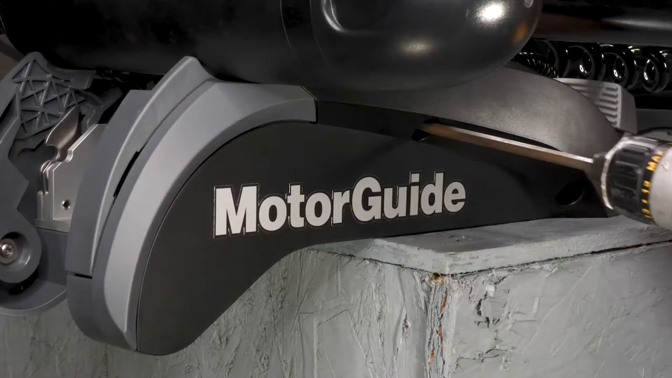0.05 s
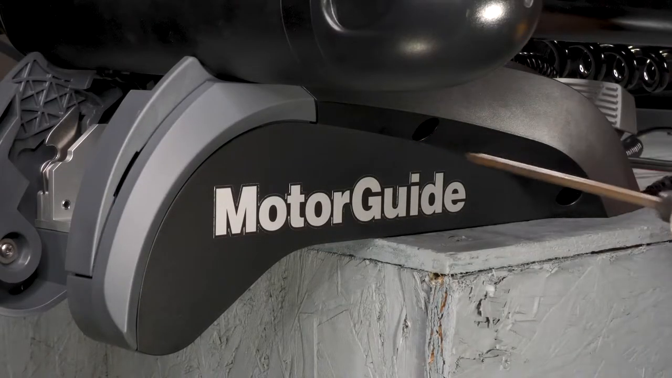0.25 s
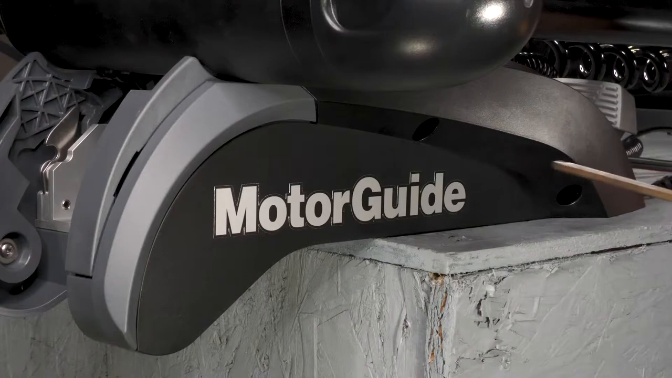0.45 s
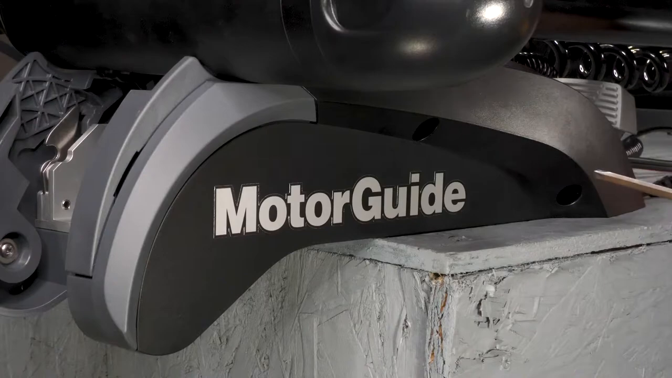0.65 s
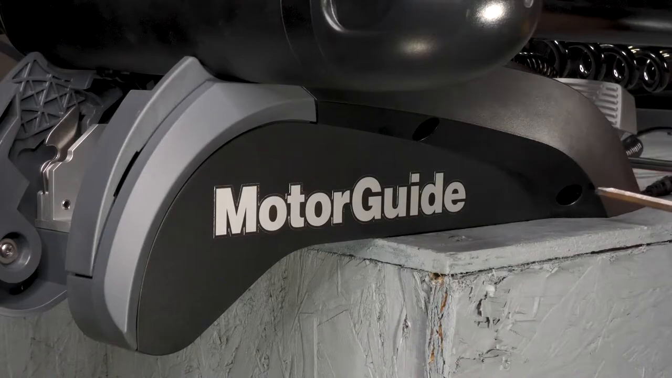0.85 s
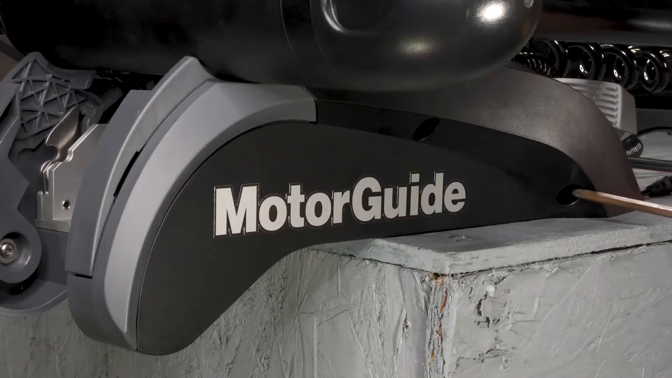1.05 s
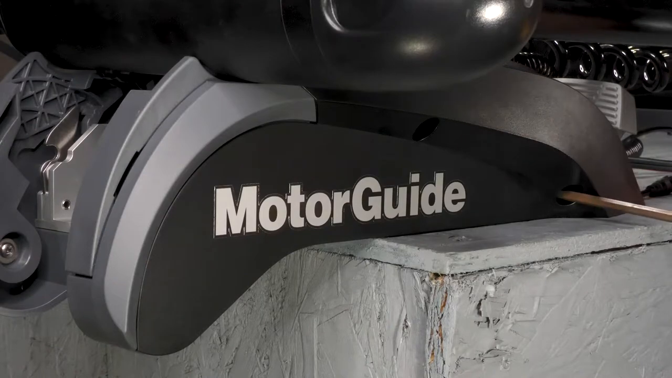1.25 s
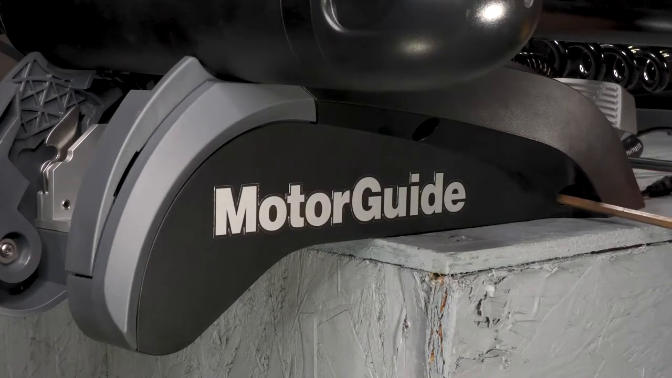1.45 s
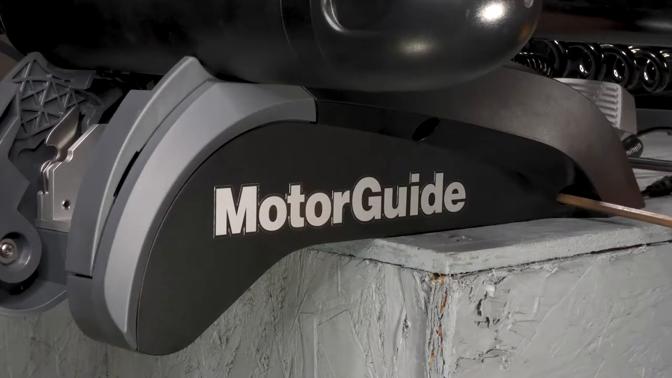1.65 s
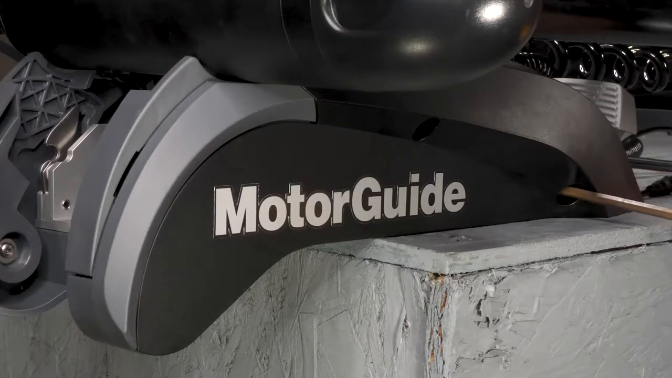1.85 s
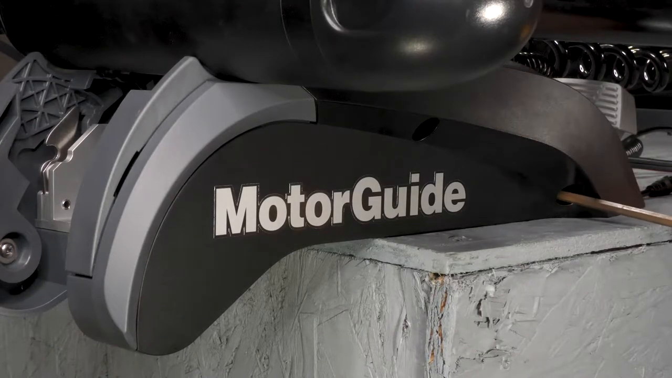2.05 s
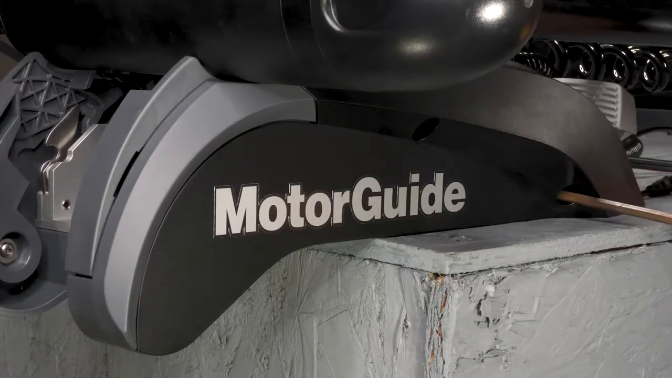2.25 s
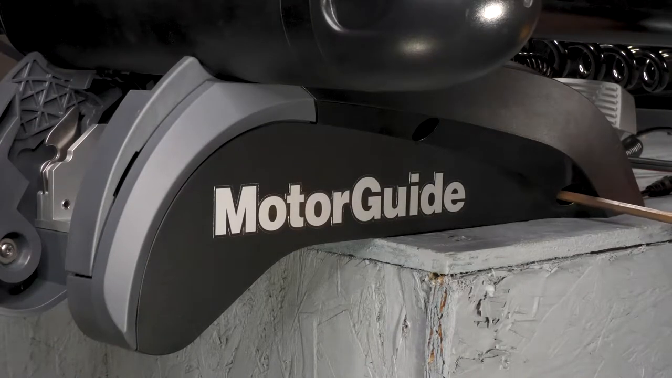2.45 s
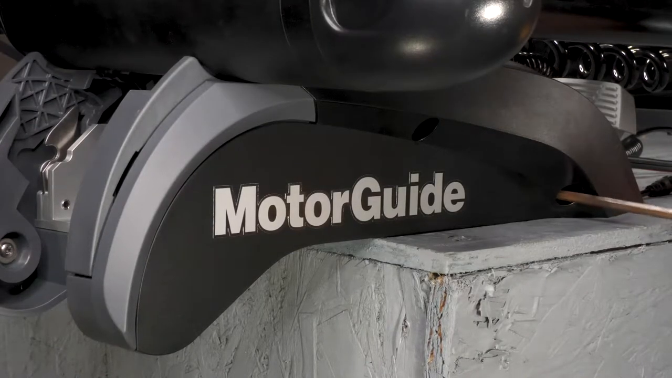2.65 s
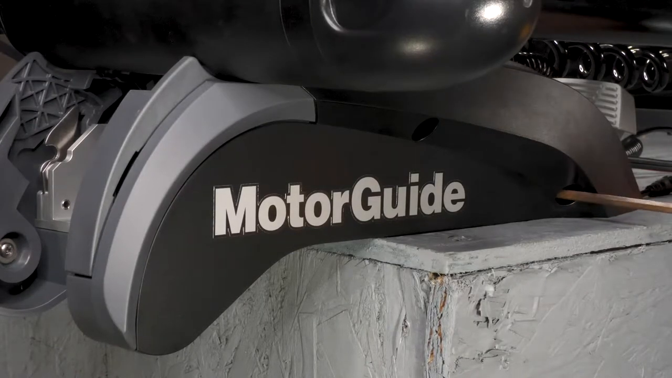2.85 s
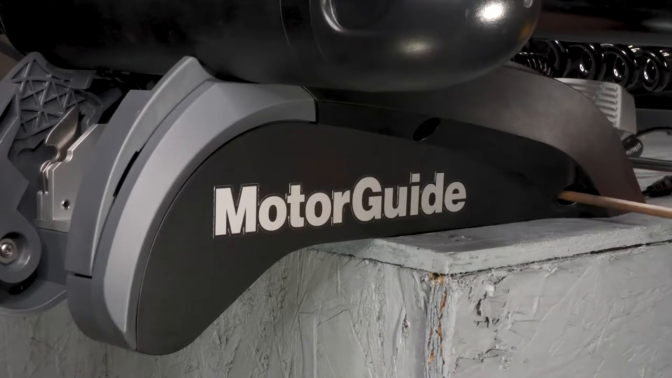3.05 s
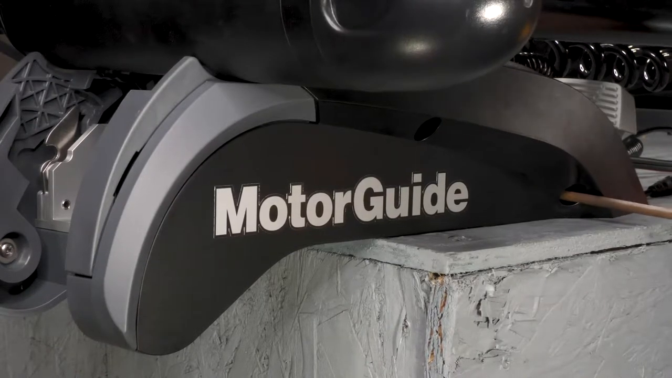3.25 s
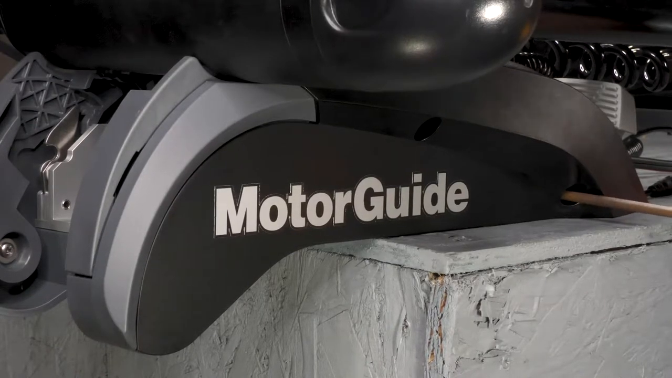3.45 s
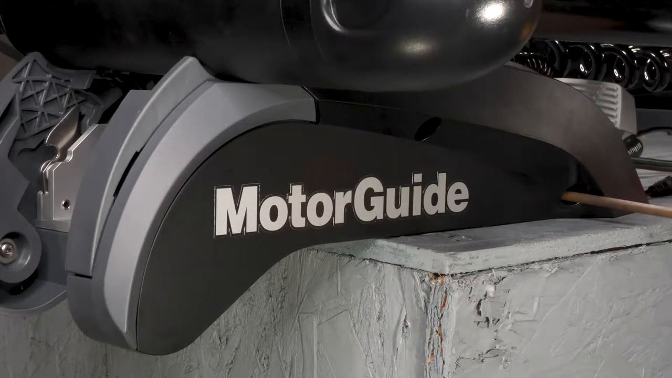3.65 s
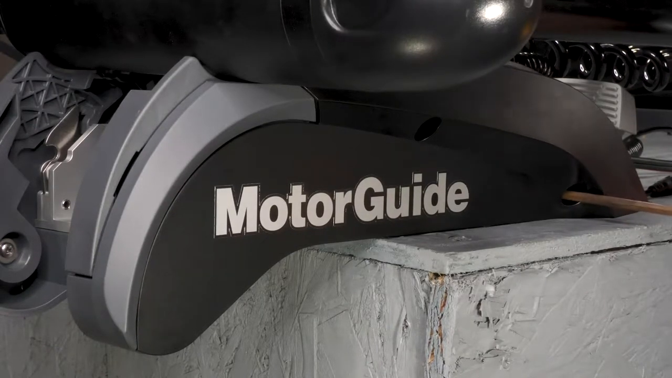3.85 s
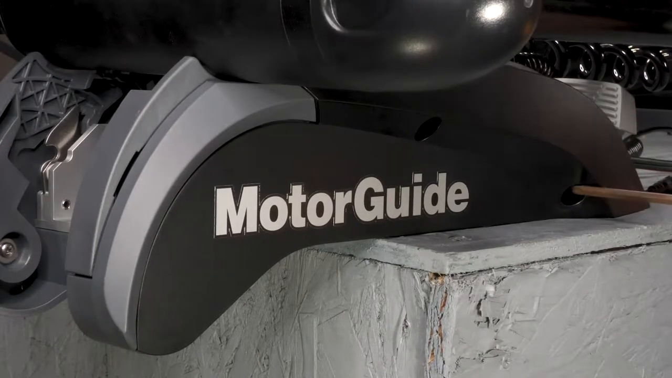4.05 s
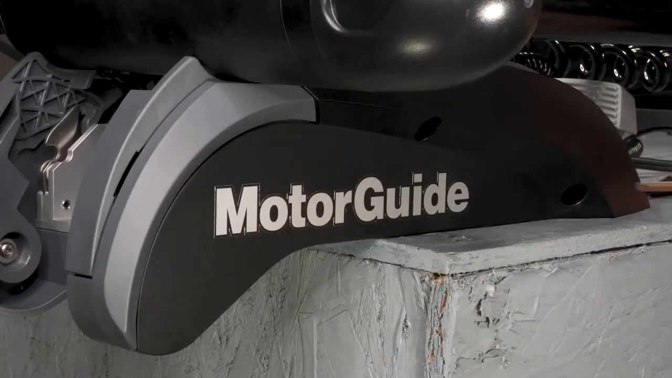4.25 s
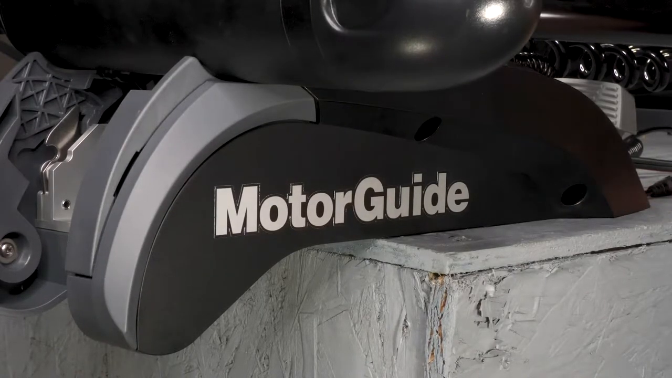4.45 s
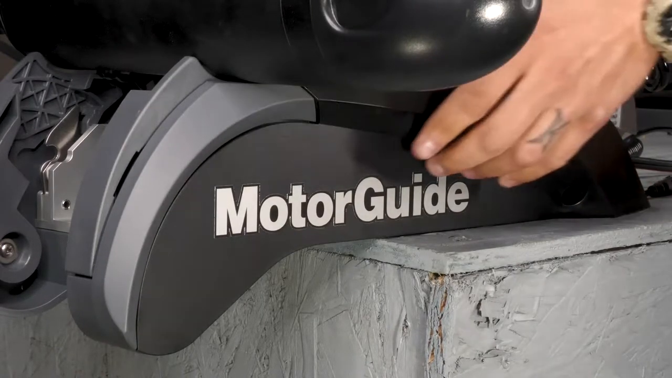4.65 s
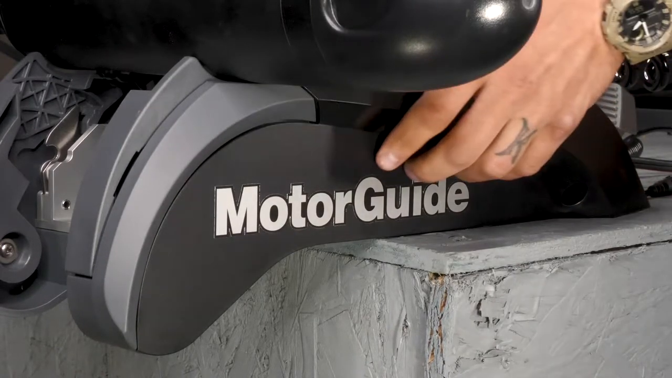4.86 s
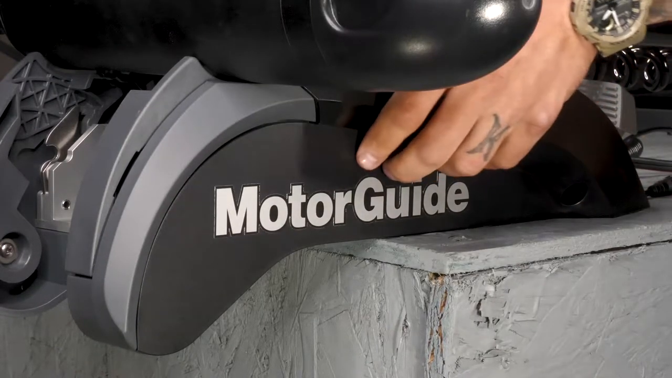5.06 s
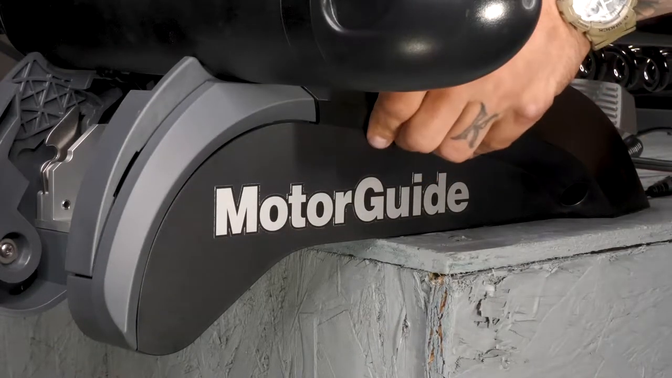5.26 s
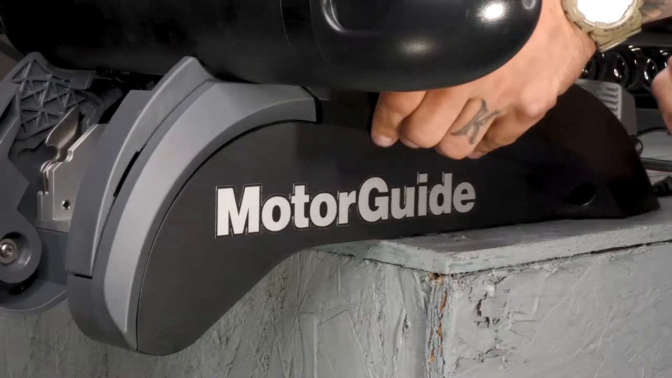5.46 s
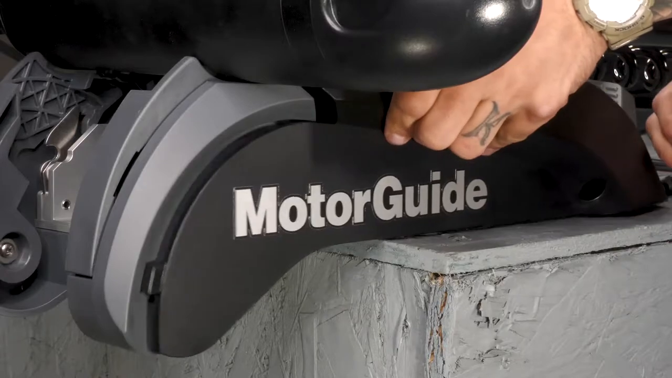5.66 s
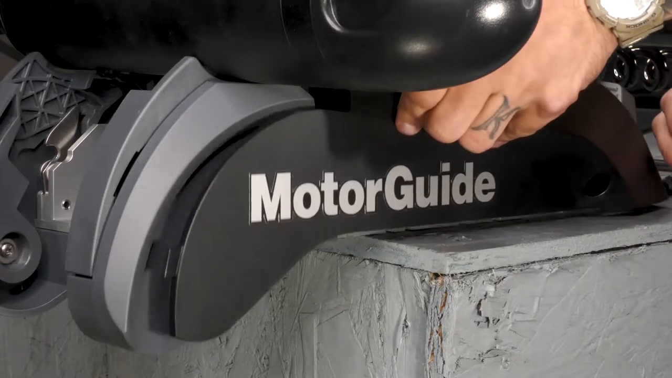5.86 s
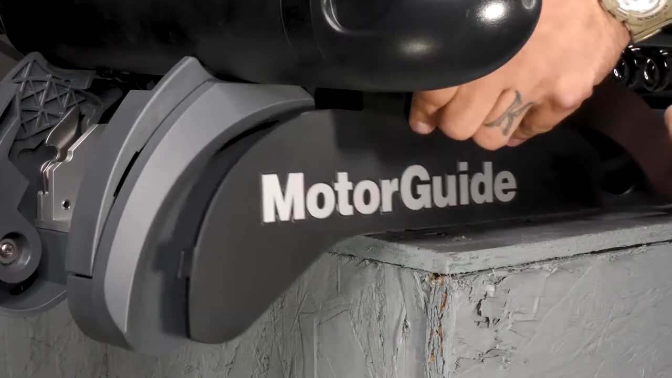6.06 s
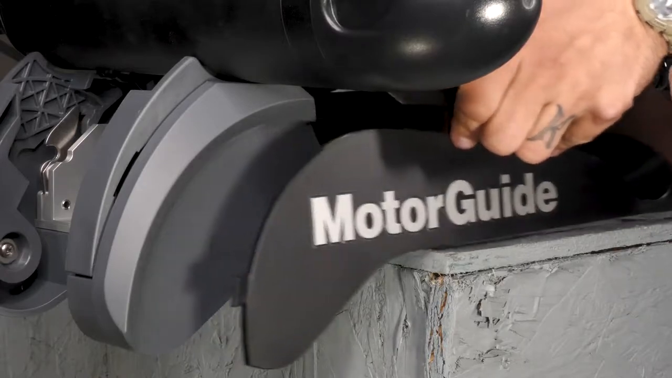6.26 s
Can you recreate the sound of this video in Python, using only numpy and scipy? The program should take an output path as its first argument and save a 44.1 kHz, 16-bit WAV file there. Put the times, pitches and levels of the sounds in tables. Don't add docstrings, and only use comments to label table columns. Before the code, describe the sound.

Over low ventilation rumble, metal taps and scrapes lead to a short jerky driver burst, a brake clack, soft rubbing and plastic snaps.

```python
import sys
import numpy as np
from scipy import signal
from scipy.fft import rfft, irfft
from scipy.io import wavfile
from scipy.ndimage import uniform_filter1d

SR = 44100
rng = np.random.default_rng(int(sys.argv[2]) if len(sys.argv) > 2 else 0)


def undo_db(level):
    steps = np.asarray(level, float) / 20
    return 10 ** steps


def wav_record(signal):
    frames = np.transpose(np.atleast_2d(signal))
    bounded = np.clip(frames, -1, 1)
    quanta = np.round(bounded * 32767).astype(np.int16)
    wavfile.write(sys.argv[1], SR, quanta)


N = 277830

# pitch_hz, density_db_per_hz
SHOP_RUMBLE = [(11, -45), (18, -1.5), (32, -19.5), (59, 2), (118, -8.5), (133, 3.5), (146, -22), (187, -10),
               (248, -23), (270, -27), (300, -26.5), (390, -53), (660, -120)]
# pitch_hz, density_db_per_hz
UNLOADED_RUMBLE = [(11, -38), (18, -4), (70, -6), (91, -7), (103, -12.5), (129, 4.5), (150, -4),
                   (163, -14.5), (300, -25), (390, -60), (660, -120)]
# pitch_hz, density_db_per_hz
AIR_HISS = [(180, -28), (300, -4), (331, -9), (527, -14.5), (839, -20), (1950, -27), (2510, -32.5),
            (2720, -31.5), (6780, -38.5), (9140, -30), (15800, -43)]
# pitch_hz, level_db, t60_s
BOX_MODES = [(45.2, -7, 0.78), (95, -16.5, 0.91), (140.2, -2, 0.43), (162.2, 1, 0.27), (196.3, -7.5, 0.36),
             (239.6, -6, .36), (288, -15, 0.49), (346.4, -11.5, 0.35), (425, -17, .13)]
# pitch_hz, t60_s
ROOM_DECAY = [(60, 0.52), (280, 0.93), (740, 0.38), (1940, 0.26), (5120, 0.23), (13500, 0.15)]
# start_s, peak_db, weight_db, sharpness_db, box_push_db
BIT_EXIT = [
    (0.0014, -49.5, 6.9, -15, -40),
    (0.0186, -46, 6.3, -25, -51),
]
# pitch_hz, width_hz, level_db
BRACKET_MODES = [(408, 110, 9.5), (708, 53, 6.5), (1190, 93, 3), (1530, 15, 9), (1740, 61, 7),
                 (2080, 28, 8), (2510, 120, -6)]
# start_s, peak_db, weight_db, sharpness_db, box_push_db
BIT_TAPS = [(1.3399, -44, 10.5, -15, -47), (1.3748, -36, 2.5, -5, -47), (1.4296, -40.5, 0.5, -11, -44),
            (1.6831, -61.5, 11.5, -8, -50.5), (1.6927, -63.5, 3, -1, -58), (1.7644, -69.5, 16, -2, -52),
            (1.7918, -49, 14.5, 0, -43), (1.871, -57, 5, 3.5, -63), (1.9001, -54, -23, -17, -59.5),
            (1.9515, -55, 13, -10, -43.5), (1.9744, -38, 3, -17, -43), (1.9898, -43.5, 9.5, -0.5, -36.5),
            (2.1046, -63, -8, -20, -48), (2.1425, -54.5, -14, -3.5, -55), (2.1604, -60, 9, -10, -49),
            (2.266, -32.5, 1.5, 3, -22.5), (2.4952, -51, 1.5, -12, -43.5), (2.6147, -29, 7, -2, -30),
            (2.6173, -14.5, -6.5, -4, -19), (2.6242, -25, -2.5, 1, -14.5), (2.9452, -23, -1, -11.5, -30)]
# pitch_hz, width_hz, level_db
STEEL_MODES = [(1144, 200, 0.5), (2676, 200, 10.5), (3930, 300, 1), (4870, 260, 0.5), (7250, 820, -2.5),
               (9100, 1800, -2)]
# peak_s, level_db, rise_s, fall_s (rise and fall over 25 dB)
SCRAPES = [
    (1.684, -76, .07, .07),
    (2.6, -63, 0.19, 0.011),
    (2.611, -42, 0.0049, 0.0058),
    (2.895, -55.5, 0.012, 0.24),
    (2.94, -52.5, 0.09, .008),
]
# pitch_hz, density_db_per_hz
SCRAPE_COLOUR = [(600, -30.5), (1000, -4), (2300, -6), (2700, 2.5), (3300, -10.5), (5000, -5.5),
                 (8000, -20), (15000, -40)]
# pitch_hz, density_db_per_hz
BRUSH_COLOUR = [(1180, -26), (2000, 2), (3730, -7), (4710, -7), (5090, -5), (5740, -10), (8050, -4.5),
                (8550, -5.5), (9570, -5), (15800, -11.5)]
# pitch_hz, density_db_per_hz
GEAR_COLOUR = [(130, -29), (220, -7), (312, -3), (478, 0.5), (545, -14), (678, -9), (853, -34),
               (994, -10.5), (1570, -16.5), (1870, -15), (3000, -40), (3900, -59), (6600, -120)]
# time_s, turns_per_s
ROTOR_SPEED = [(3.0, 205), (3.24, 225), (3.4, 243), (3.5, 246.5), (3.7, 251), (3.73, 249), (3.8, 220)]
# multiple_of_turn_rate, level_db
WHINE_ORDERS = [(17, -9), (18, -6), (19, -6), (20, -1), (21, -5), (22, 0), (23, -4), (24, -6), (25, -9)]
# time_s, level_db
TORQUE = [(2.86, -52), (2.91, -41.5), (2.97, -63), (3.115, -33), (3.244, -28), (3.29, -39), (3.43, -51),
          (3.63, -41), (3.73, -43.5)]
# start_s, peak_db, weight_db, sharpness_db, box_push_db
THREAD_SLIPS = [
    (3.0958, -37, 5.5, -1, -33.5),
    (3.3201, -38.5, -3.5, -3, -39),
    (3.425, -20, -13, -13.5, -36),
    (3.4438, -36, -3, -14, -54),
    (3.5386, -29.5, 2.5, -12, -41),
    (3.6493, -27, -3, -10, -36.5),
    (3.6713, -34, -6.5, -13, -46),
    (3.759, -34.5, -13, -13, -56),
]
# pitch_hz, width_hz, level_db
SCREW_MODES = [(405, 134, 5), (693, 165, 9.5), (1230, 460, -5), (1837, 76, 2.5), (2620, 230, -1.5),
               (3500, 190, -10.5), (4200, 67, -19)]
# start_s, peak_db, weight_db, sharpness_db, box_push_db
BRAKE_CLACKS = [
    (3.9167, -41, -13, -32, -42),
    (3.92, -39, 0.5, -11.5, -42.5),
    (3.9313, -32.5, -15, -38, -41),
    (4.1016, -61.5, 5.5, -20, -47),
]
# pitch_hz, width_hz, level_db
HOUSING_MODES = [(420, 210, 5), (1870, 140, 10.5), (2200, 320, 5), (3260, 680, -4), (4070, 290, -7)]
# start_s, peak_db, pitch_hz, t60_s
LATCH_TICKS = [
    (4.4074, -64.5, 11950, 0.013),
    (4.5154, -62, 11500, 0.013),
    (4.5273, -53.5, 7840, 0.007),
    (5.0458, -62, 8970, 0.012),
]
# start_s, peak_db, weight_db, sharpness_db, box_push_db
COVER_CLACKS = [(4.574, -58, 1, -16, -61), (5.4289, -46, 10, -10, -67), (5.441, -29.5, -1.5, -15, -47),
                (5.4559, -38, 6, -32, -44), (5.5764, -53.5, 13, -13, -45.5), (5.6011, -40, 6, -9, -54.5),
                (5.636, -42.5, 3.5, -7.5, -47), (5.6678, -39, 2, -21, -47.5),
                (5.7185, -41.5, -10, -21, -47), (5.7496, -39, -1, -35, -50.5), (5.9467, -49, 5, -26, -46),
                (5.9704, -43, 8.5, -15, -46.5), (6.2546, -50, -3, -18, -46.5)]
# pitch_hz, width_hz, level_db
PLASTIC_MODES = [(450, 210, 3), (660, 74, 3), (1265, 140, 4), (1895, 190, 4.5), (2700, 250, 2),
                 (3140, 250, -0.5), (5300, 790, -0.5), (7400, 980, -1)]
# peak_s, level_db, rise_s, fall_s (rise and fall over 25 dB)
HAND_RUBS = [
    (4.736, -74.5, 0.077, 0.3),
    (4.876, -71.5, .09, 0.4),
    (5.186, -61.5, 0.054, 0.14),
    (5.948, -68, .04, 0),
    (6.258, -64, .008, 0.5),
]
# pitch_hz, density_db_per_hz
HAND_COLOUR = [(530, -31), (900, -14), (989, -14), (1480, -6), (2360, -19), (2820, -13.5), (3650, -20),
               (15000, -25)]


def seconds():
    return np.arange(N) / SR


def rms_one(x):
    return x / np.sqrt(np.mean(x ** 2) + 1e-20)


def in_time(rows):
    time_s, value = np.transpose(rows)
    return uniform_filter1d(np.interp(seconds(), time_s, value), size=300)


def at_hz(points, hz):
    point_hz, value = np.transpose(points)
    return np.interp(np.log(hz), np.log(point_hz), value)


def band(x, low_hz, high_hz):
    sos = signal.butter(2, [low_hz, high_hz], "band", fs=SR, output="sos")
    return signal.sosfilt(sos, x + 1e-18)


def drift(rate_hz):
    r = np.exp(-2 * np.pi * rate_hz / SR)
    noise = rng.standard_normal(N + SR)
    return rms_one(signal.lfilter([1], [1, -2 * r, r * r], noise)[SR:])


def swell(from_s, rise_s):
    since_s = np.maximum(seconds() - from_s, 0)
    return 40 * np.log10(1 - np.exp(-since_s / rise_s) + 1e-4)


def ring(x, hz, t60_s):
    r = undo_db(-60 / (t60_s * SR))
    w = 2 * np.pi * hz / SR
    return signal.lfilter([0, np.sin(w)], [1, -2 * r * np.cos(w), r * r], x + 1e-18)


def peak(x, hz, width_hz):
    r = np.exp(-np.pi * width_hz / SR)
    w = 2 * np.pi * hz / SR
    return signal.lfilter([(1 - r * r) / 2, 0, (r * r - 1) / 2], [1, -2 * r * np.cos(w), r * r], x + 1e-18)


def coloured(spectrum, low_hz=10, high_hz=16000):
    hz = np.arange(1, N // 2 + 2) * SR / N
    shape = undo_db(at_hz(spectrum, hz)) * (hz > low_hz) * (hz < high_hz)
    return rms_one(irfft(shape * rfft(rng.standard_normal(N)), N))


def shop():
    rumble_db, pressed_db, hiss_db = -48, 3.5, -68.5
    pressed_from_s, pressed_to_s, press_ease_s = 2.02, 4.18, 0.4
    unloaded_s, unload_ease_s = 4.58, 0.053
    t = seconds()
    late = np.clip((t - unloaded_s) / unload_ease_s, 0, 1)
    inside_s = np.minimum(t - pressed_from_s, pressed_to_s - t)
    pressed = np.clip(inside_s / press_ease_s + .5, 0, 1)
    rumble = np.sqrt(1 - late) * coloured(SHOP_RUMBLE, high_hz=277)
    rumble = rumble + np.sqrt(late) * coloured(UNLOADED_RUMBLE, high_hz=324)
    rumble = undo_db(rumble_db + pressed_db * pressed + 0.26 * drift(7.3)) * rumble
    return rumble + undo_db(hiss_db) * coloured(AIR_HISS, low_hz=300)


def box(force):
    return sum((-1) ** k * undo_db(db) * ring(force, hz, t60_s) for k, (hz, db, t60_s) in enumerate(BOX_MODES))


def knocks(events, body, contact_ms, top_db, ring_db, plain_db, boom_db, far_db, far_ring):
    lead_s, box_lag_s, build_s = .0015, 0.01007, .0007
    rattle, crack = np.zeros((2, 4, N + 4000))
    push = np.zeros(N + 4000)
    t = np.arange(1500) / SR
    shape = np.exp(-1000 * t / contact_ms) * (1 - np.exp(-t / build_s)) ** 2
    grit = rng.laplace(0, .7, (len(events), len(t)))
    for (s, db, weight_db, sharp_db, box_db), noise in zip(events, grit):
        at = max(round((s - lead_s) * SR), 0)
        gains = undo_db(db + np.array([weight_db, 0, sharp_db, sharp_db + top_db]))
        rattle[:, at:at + len(t)] += gains[:, None] * shape * noise
        crack[:, at] += gains * np.sqrt(np.sum(shape ** 2))
        push[at + round(box_lag_s * SR)] += undo_db(box_db + boom_db)

    def through_body(v, low_gain):
        v = (band(v[0], 280, 1500) * low_gain - band(v[1], 1500, 4000) * 2.5
             + band(v[2], 4000, 7500) * 2.5 - band(v[3], 7500, 13500) * 1.5)
        rung = sum(undo_db(db) * peak(v, hz, width_hz) for hz, width_hz, db in body)
        return (undo_db(ring_db) * rung, undo_db(plain_db) * v)

    rung, plain = through_body(rattle, 2.5)
    near = (rung + plain + box(push))[:N]
    rung, plain = through_body(crack, 4.5)
    far = (far_ring * rung + plain)[:N]
    return near, undo_db(far_db) * far


def bit_exit():
    return knocks(BIT_EXIT, BRACKET_MODES, contact_ms=4.0, top_db=4, ring_db=0.0, plain_db=-8.0,
                  boom_db=-6, far_db=-2.0, far_ring=0.57)


def room(x):
    t = np.arange(SR) / SR
    edges_hz = 250 * 2 ** np.arange(0, 6.1, .25)
    white, tail = rng.standard_normal(SR), 0
    for k, (low_hz, high_hz) in enumerate(zip(edges_hz, edges_hz[1:])):
        t60_s = at_hz(ROOM_DECAY, low_hz)
        dying = rms_one(band(white, low_hz, high_hz) * undo_db(-60 * t / t60_s))
        tail = tail + (-1) ** k * np.sqrt((high_hz - low_hz) * t60_s) * dying
    tail = tail * (1 - np.exp(-t / 0.0013))
    return signal.fftconvolve(x, tail / np.sqrt(np.sum(tail ** 2)))[:N]


def bit_taps():
    return knocks(BIT_TAPS, STEEL_MODES, contact_ms=3.0, top_db=4, ring_db=-3, plain_db=-7,
                  boom_db=-3, far_db=-2.5, far_ring=.4)


def rubbing(strokes, colour):
    t = seconds()
    level = sum(undo_db(db - 25 * np.maximum((s - t) / rise_s, (t - s) / fall_s)) for s, db, rise_s, fall_s in strokes)
    return level * undo_db(2.5 * drift(60)) * coloured(colour)


def bit_scrapes():
    return rubbing(SCRAPES, SCRAPE_COLOUR)


def switching_whine(off_db):
    level_db, tone_hz, octave_db = -54.5, 7760, -26.5
    trigger_s, half_pull_s, rise_db_per_s, fall_db_per_s = 2.492, 3.1, 9, 9.5
    t = seconds()
    phase = 2 * np.pi * tone_hz * t
    pull_db = np.minimum(rise_db_per_s * (t - half_pull_s), fall_db_per_s * (half_pull_s - t))
    level = undo_db(level_db + pull_db + swell(trigger_s, 0.0023) + 4.0 * off_db)
    return level * (np.sin(phase) + undo_db(octave_db) * np.sin(2 * phase))


def brush_hiss(run_db):
    return undo_db(-48.5 + run_db + 0.35 * drift(43)) * coloured(BRUSH_COLOUR)


def gear_growl(run_db):
    gear_db, jerk_db, jerk_s = -45, -30.5, 0.048
    t = seconds()
    jerks = sum(np.sqrt(undo_db(db)) * (t > s) * np.exp(-np.abs(t - s) / jerk_s) for s, db, *_ in THREAD_SLIPS)
    level = (undo_db(gear_db) + undo_db(jerk_db) * jerks) * undo_db(run_db)
    return level * undo_db(1.5 * drift(25)) * coloured(GEAR_COLOUR)


def torque_shake(start_s, off_db):
    level = (seconds() > start_s) * undo_db(in_time(TORQUE) + off_db)
    return level * rms_one(box(band(rng.standard_normal(N), 125, 158)))


def armature_whine(off_db):
    mesh_db, from_s, rise_s, shell_hz, shell_width_hz = -59, 3.06, 0.095, 5200, 900
    turns = 2 * np.pi * np.cumsum(in_time(ROTOR_SPEED)) / SR
    lines = sum(undo_db(db + 2.5 * drift(8)) * np.sin(k * turns) for k, db in WHINE_ORDERS)
    return undo_db(mesh_db + swell(from_s, rise_s) + 2 * off_db) * peak(lines, shell_hz, shell_width_hz)


def motor():
    start_s, stop_s, spin_up_s, run_down_db_per_s = 2.862, 3.77, 0.056, 268
    off_db = -run_down_db_per_s * np.maximum(seconds() - stop_s, 0)
    run_db = swell(start_s, spin_up_s) + off_db
    noise = brush_hiss(run_db) + gear_growl(run_db) + torque_shake(start_s, off_db)
    return switching_whine(off_db) + noise + armature_whine(off_db)


def thread_slips():
    return knocks(THREAD_SLIPS, SCREW_MODES, contact_ms=2.53, top_db=9, ring_db=4.0, plain_db=-12,
                  boom_db=0.0, far_db=0.0, far_ring=0.41)


def spindle_brake():
    return knocks(BRAKE_CLACKS, HOUSING_MODES, contact_ms=6.0, top_db=8.5, ring_db=-3, plain_db=-12,
                  boom_db=-3, far_db=-2, far_ring=.6)


def latch_ticks():
    near = np.zeros(N)
    for s, db, hz, t60_s in LATCH_TICKS:
        click = undo_db(db) * (np.arange(N) == round(s * SR))
        near += ring(click, hz, t60_s)
    return near, 0.36 * near


def cover_clacks():
    return knocks(COVER_CLACKS, PLASTIC_MODES, contact_ms=1.5, top_db=-3, ring_db=-2, plain_db=-10,
                  boom_db=0, far_db=-5, far_ring=.7)


def hand_rubs():
    return rubbing(HAND_RUBS, HAND_COLOUR)


def scene():
    room_db = 5
    contacts = [bit_exit(), bit_taps(), thread_slips(), spindle_brake(), latch_ticks(), cover_clacks()]
    near, far = np.sum(contacts, axis=0)
    friction = bit_scrapes() + hand_rubs()
    return (near + undo_db(room_db) * room(far) + motor() + friction + shop())[None]


def top_cut(x):
    return signal.sosfilt(signal.butter(12, 16470, fs=SR, output="sos"), x)


def record(dry):
    low_pass = signal.cheby2(16, 45, 16500, fs=SR, output="sos")
    mix = signal.sosfilt(low_pass, dry)
    return top_cut(mix)


dry = scene()
out = record(dry)
wav_record(out)
```